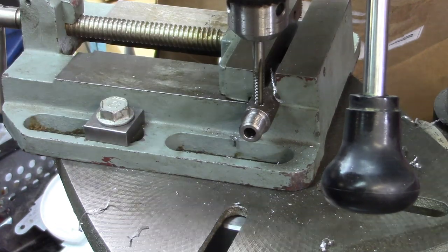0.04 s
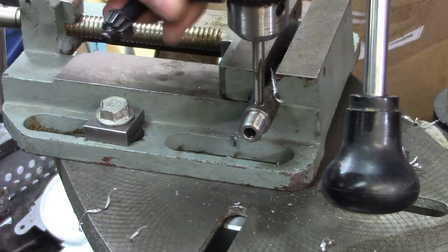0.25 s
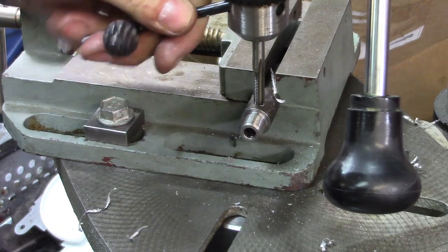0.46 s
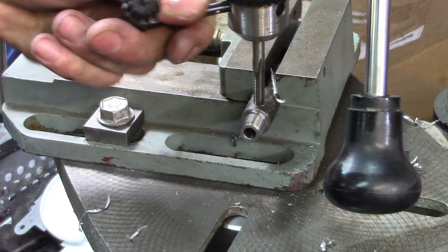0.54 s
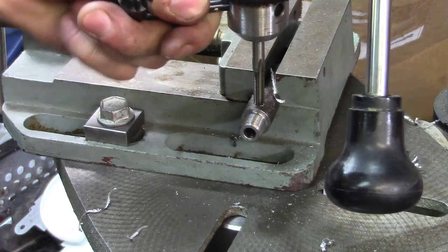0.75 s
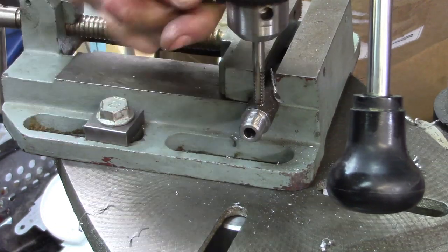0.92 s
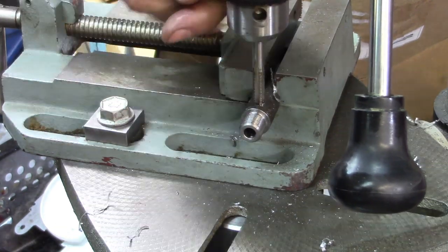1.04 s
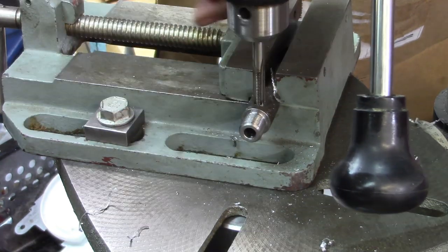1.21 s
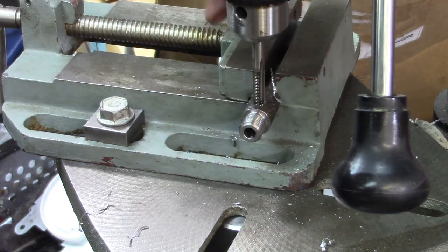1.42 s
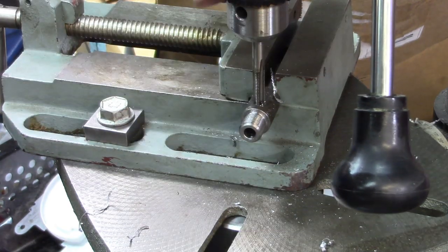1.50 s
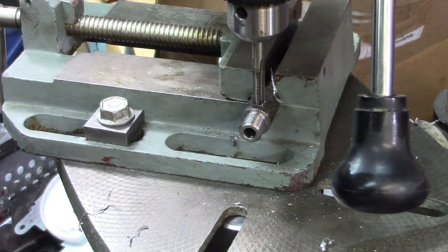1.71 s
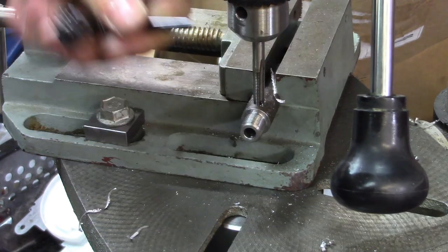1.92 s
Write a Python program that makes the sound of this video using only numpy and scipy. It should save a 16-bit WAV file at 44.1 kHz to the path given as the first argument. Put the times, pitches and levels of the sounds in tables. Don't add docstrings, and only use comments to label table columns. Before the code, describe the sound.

Close up in a quiet workshop, a hand seats a metal key with a bright clack, gives a cluster of dull hollow knocks, pauses, then pulls it free with lighter clicks and clinks.

```python
import sys
import numpy as np
from scipy import signal
from scipy.fft import rfft, irfft
from scipy.io import wavfile
from scipy.ndimage import uniform_filter1d

SR = 44100
rng = np.random.default_rng(int(sys.argv[2]) if len(sys.argv) > 2 else 0)


def linear_from_db(decibels):
    return 10 ** (np.asarray(decibels, float) / 20)


def waveform_to_disk(signal):
    frames = np.transpose(np.atleast_2d(signal))
    scaled = np.clip(frames, -1, 1) * 32767
    samples = np.round(scaled).astype(np.int16)
    wavfile.write(sys.argv[1], SR, samples)


N = 85995

# f/Hz, density/dB
SHOP_SPECTRUM = [(15, -40), (25, -3), (114, -2.5), (161, -6.5), (503, -7.5), (545, -6), (591, -9.5),
                 (2110, -21), (16000, -42)]
# t/s, level/dB
SHOP_ACTIVITY = [(0, 1.5), (.1, -4), (.22, 3.5), (.8, 1), (1.25, 3), (1.5, 1), (1.95, 2.5)]
# t/s, level/dB, push duration/ms, side panel level/dB
KNOCKS = [(.004, -50.5, 1, 3.5), (.2295, -25, 0.53, 9.5), (.2345, -14, 1, 4), (.256, -29.5, 0.49, -2),
          (.3345, -15.5, 1, -1), (.489, -26, 0.9, 0), (.507, -21.5, 0.35, -1.5), (.517, -46, 1, -7),
          (.527, -17, 0.97, 1), (.5365, -8.5, 0.52, -5), (.546, -18.5, 0.6, 0.5), (.557, -16, 0.48, -1.5),
          (.632, -47, 0.46, -2), (.663, -54, 0.77, 3), (.790, -64, 0.4, -11), (.955, -54.5, 0.4, 3),
          (1.045, -54, 0.14, -7), (1.485, -53, 0.71, -15), (1.594, -34, 0.93, 2.5), (1.609, -28.5, 1, 1),
          (1.640, -22.5, 0.16, -2.5), (1.694, -47, 0.18, 17.5), (1.722, -48.5, 0.99, 18),
          (1.729, -32, 0.082, 6.5), (1.745, -31, 0.43, 2.5), (1.8365, -45.5, 0.67, 3)]
# f/Hz, level/dB, T60/s
HEAD_MODES = [(513, -6, 0.22), (554.5, 3, 0.16), (582.7, -5, 0.2), (546, -27, 0.68)]
# f/Hz, level/dB, T60/s
PANEL_MODES = [(159, -26.5, 0.1), (278, -22, 0.15), (563, -8.5, 0.02), (366.2, -14.5, 0.22),
               (442, -8.5, 0.077), (464.5, -13.5, 0.17), (620.4, -12.5, 0.11), (689.5, -8.5, 0.11),
               (789.5, -4.5, 0.064), (868, -6.5, 0.048), (993, -24.5, 0.11), (1127, -25.5, 0.2),
               (1274, -21, 0.043), (1374, -32, 0.15)]
# t/s, level/dB
SCRAPE_LEVEL = [(.22, -103), (.235, -36.5), (.30, -50.5), (.39, -47.5), (.46, -72.5), (.50, -52),
                (.55, -42), (.62, -60), (.70, -69.5), (.78, -75.5), (1.56, -68), (1.60, -49.5),
                (1.70, -49.5), (1.76, -49.5), (1.81, -61.5), (1.89, -63), (1.95, -62)]
# f/Hz, density/dB
GRIT_SPECTRUM = [(300, -27.5), (900, 13.5), (1400, 6), (2500, -3), (4000, -8), (8000, -16), (15000, -25.5)]
# t/s, sleeve level/dB, sleeve contact f/Hz, jaws level/dB, key level/dB
CONTACTS = [(.2272, -28.5, 2570, -31.5, -38), (0.2294, -25.5, 3900, -28, -24.5),
            (0.2322, -25, 3020, -32, -44), (0.2331, -31, 3900, -26, -36), (.298, -43, 3200, -62, -70),
            (0.3301, -43, 2270, -36.5, -47), (0.3358, -36, 2840, -41.5, -50),
            (0.505, -43.5, 2800, -72, -77.5), (0.5359, -38, 2270, -68, -69.5),
            (.5495, -57.5, 4500, -64, -48), (0.6294, -53.5, 2700, -78, -76), (0.6655, -50, 4940, -66, -67),
            (0.779, -68, 3130, -58, -80), (0.862, -54.5, 2030, -80, -81), (1.374, -53, 2700, -75, -72),
            (1.594, -45, 3700, -74, -83), (1.636, -32, 2500, -38.5, -47), (1.6864, -21.5, 4200, -31.5, -59),
            (1.695, -36, 4500, -33, -42), (1.7305, -30.5, 2270, -38, -48), (1.7325, -36, 3700, -52, -46),
            (1.7444, -23.5, 3700, -29.5, -35.5), (1.88, -49.5, 2550, -62, -80)]
# f/Hz, level/dB, T60/s
SLEEVE_MODES = [(2030, -13, 0.05), (2270, 0.5, 0.028), (2510, -6, 0.067), (2800, -2, 0.012),
                (3047, -19, 0.029), (3700, -5.5, 0.017), (3900, -10.5, 0.036), (4130, -6.5, 0.026),
                (4500, -21, 0.031)]
# f/Hz, level/dB, T60/s
JAW_MODES = [(5210, -14, 0.045), (6110, -8, 0.0087), (6500, -11, 0.016), (7330, -12, 0.021),
             (8140, -9.5, 0.03)]
# f/Hz, level/dB, T60/s
KEY_MODES = [(9870, -13, 0.027), (10490, -5, 0.028), (10180, -28, .045), (11820, -7.5, 0.06),
             (12070, 0, 0.053), (12080, -15, .08), (13030, -26, .02)]
# t/s, f/Hz, level/dB, T60/s, free time/s
LINGERING = [(.232, 3970, -26.5, 0.014, 0.024), (.257, 3900, -53.5, .3, 0.039), (.240, 7420, -42, .05, .03),
             (.338, 7880, -55, 0.11, .02), (.775, 907, -54, 0.25, 0.04), (.862, 2030, -65, 0.91, 0.29),
             (1.285, 429, -52.5, 0.45, 0.15), (1.637, 2562, -47, 0.18, 0.059),
             (1.709, 8090, -60, .4, 0.022), (1.745, 3880, -53, 0.08, .045),
             (1.745, 8270, -41, 0.073, 0.013), (1.747, 5460, -43, 0.043, .03), (1.765, 985, -56, 0.72, .15)]
# t/s, level/dB
THUMPS = [
    (0.235, -28.5),
    (0.546, -42),
    (0.596, -41),
    (1.692, -55),
]
# t/s, main mode level/dB, low panel level/dB
NUDGES = [(0.2469, -20, -23), (.262, -33, -26.5), (.300, -41, -50), (.313, -32, -52), (.3665, -24.5, -33.5),
          (.3738, -25.5, -48), (.3811, -29, -42), (.405, -48, -39), (0.439, -44.5, -57.5),
          (.5440, -14, -40), (0.555, -21, -44.5), (.565, -14, -44), (.600, -34.5, -37), (.630, -51, -39),
          (.645, -37, -36.5), (.660, -34.5, -44.5), (0.672, -39.5, -44), (.680, -64, -36), (.712, -38, -60),
          (.745, -52, -62), (.800, -65, -69), (.845, -56, -62), (1.270, -65, -56), (1.465, -55, -67),
          (1.671, -31, -62), (1.726, -27, -57), (1.765, -34, -54), (1.778, -35.5, -66), (1.790, -49, -55),
          (1.805, -30.5, -56), (1.836, -35.5, -60)]
# f/Hz, T60/s
NUDGE_MODES = [(551, 0.073), (368, 0.1)]
# t/s, tick level/dB, f/Hz, rustle level/dB, rustle decay/s
TICKS = [
    (0.6649, -50.5, 4200, -56.5, 0.043),
    (0.26, -38, 3770, -40, 0.012),
    (.5495, -41, 3900, -58, 0.016),
    (.631, -52, 2200, -70, .01),
    (1, -63, 2600, -69, .01),
    (1.7, -56, 1000, -52, .03),
    (0.33, -50, 3000, -55, 0.0095),
    (0.779, -68, 3360, -60, 0.047),
    (1.400, -70, 4700, -65, 0.039),
    (1.886, -67, 3400, -53.5, 0.045),
]
# t/s, depth/dB, half width/s
GRIPS = [(0.26, 4, 0.0055), (.363, 12, 0.0059), (0.399, 14, 0.0051), (.432, 0, 0.0039), (.480, -8, .01),
         (.594, 11, 0.0039), (.624, 3, 0.0065), (.697, 14, 0.015), (1.606, 10, 0.0037), (1.669, 9, 0.0027),
         (1.713, 16, 0.0057), (1.766, 5, .004), (1.812, 8, .01), (1.870, 11, 0.013)]
# t/s, level/dB
COLLAR_TAPS = [
    (.555, -47),
    (.6365, -54),
    (1.596, -47),
    (1.613, -43),
    (1.693, -35.5),
    (1.702, -40),
    (1.738, -40.5),
    (1.752, -46),
]
# f/Hz, level/dB, T60/s
COLLAR_MODES = [(1240, 2.5, 0.044), (1406, 6, 0.055), (1450, -16, 0.032)]


def unit(x):
    return x / np.sqrt(np.mean(x ** 2))


def ring(x, hz, t60):
    pole = np.exp(2j * np.pi * hz / SR - np.log(1000) / (t60 * SR))
    return signal.lfilter([1], [1, -pole], x).imag


def impulses(times, db):
    drive = np.zeros(N)
    drive[(np.asarray(times) * SR).astype(int)] = linear_from_db(db)
    return drive


def colour(x, table):
    f = np.arange(len(x) // 2 + 1) * SR / len(x) + 1
    points = np.array(table)
    gain_db = np.interp(np.log(f), np.log(points[:, 0]), points[:, 1])
    return irfft(rfft(x) * linear_from_db(gain_db), len(x))


def walk(rate_hz):
    k = int(SR / rate_hz)
    steps = np.repeat(rng.standard_normal(N // k + 1), k)
    return unit(uniform_filter1d(uniform_filter1d(steps, k), k)[:N])


def curve(table):
    points = np.array(table)
    return linear_from_db(np.interp(np.arange(N) / SR, points[:, 0], points[:, 1]))


def shop():
    hum_noise, air = rng.standard_normal((2, N))
    air = unit(colour(air, SHOP_SPECTRUM)) * linear_from_db(-56.5 + 0.8 * walk(6.9)) * curve(SHOP_ACTIVITY)
    hum_hz, hum_width_hz = 540.4, 16
    hum = unit(ring(hum_noise, hum_hz, np.log(1000) / np.pi / hum_width_hz))
    return air + hum * linear_from_db(-67.5 + 2 * walk(9.4))


def push(offset_db):
    drive = np.zeros(N)
    for (s, level_db, ms, _), db in zip(KNOCKS, offset_db):
        pulse = np.hanning(max(int(ms * SR / 1000), 2) + 2)
        start = int(s * SR)
        drive[start:start + len(pulse)] += pulse / pulse.sum() * linear_from_db(level_db + db)
    return drive


def head(grit):
    out = np.zeros(N)
    panel_db = np.array(KNOCKS)[:, 3]
    grit_drive = grit * linear_from_db(-10) / 10
    for modes, knock_db, spread_db in ((HEAD_MODES, 0 * panel_db, 0.4), (PANEL_MODES, panel_db, 2)):
        chance = rng.standard_normal((len(KNOCKS), len(modes)))
        for m, (hz, db, t60) in enumerate(modes):
            drive = push(knock_db + spread_db * chance[:, m]) + grit_drive
            out += (-1) ** m * linear_from_db(db) * ring(drive, hz, t60)
    return signal.lfilter(*signal.butter(2, 140, "high", fs=SR), out)


def scrape():
    impacts_per_s = 1500
    hit = rng.random(N) < impacts_per_s / SR
    size_db = np.minimum(1.8 * rng.exponential(size=N), 14)
    size = linear_from_db(size_db) * rng.standard_normal(N)
    grit = unit(colour(hit * size + 0.29 * rng.standard_normal(N), GRIT_SPECTRUM))
    return grit * curve(SCRAPE_LEVEL) * linear_from_db(2.5 * walk(60.13))


def clinks():
    rows = np.array(CONTACTS)
    times, out = rows[:, 0], np.zeros(N)
    seated = np.arange(N) > 0.3 * SR
    crack_decay_s, crack_t60_s = 0.0047, 0.00027
    for col, modes, crack_hz in ((1, SLEEVE_MODES, 1100), (3, JAW_MODES, 5470), (4, KEY_MODES, 12900)):
        is_key = modes is KEY_MODES
        wobble_db = 5 if is_key else 1.8
        chance = rng.standard_normal((len(rows), len(modes)))
        for m, (hz, db, t60) in enumerate(modes):
            level_db = rows[:, col] + 1.5 * chance[:, m]
            if modes is SLEEVE_MODES:
                level_db = level_db - 18.5 * np.abs(np.log2(hz / rows[:, 2]))
            drive = impulses(times, level_db) * (-1) ** m
            if is_key:
                dulling = linear_from_db(-55 * np.log2(hz / KEY_MODES[1][0]))
                tone = ring(drive * ~seated, hz, t60) + dulling * ring(drive * seated, hz, t60 * 0.45)
            else:
                tone = ring(drive, hz, t60)
            out += linear_from_db(db + wobble_db * walk(150)) * tone
        crack = ring(ring(rng.standard_normal(N), crack_hz, crack_t60_s), crack_hz, crack_t60_s)
        decay = [1, -np.exp(-1 / (crack_decay_s * SR))]
        out += signal.lfilter([1], decay, impulses(times, rows[:, col] - 9)) * unit(crack)
    return signal.sosfilt(signal.butter(3, (700, 13000), "band", fs=SR, output="sos"), out)


def linger():
    t, out = np.arange(N) / SR, np.zeros(N)
    for s, hz, db, t60, free_s in LINGERING:
        touched = np.exp(-np.maximum(t - s - free_s, 0) / 0.004)
        out += linear_from_db(db + 4 * walk(120)) * touched * ring(impulses(s, 0), hz, t60)
    return out


def thumps():
    times, db = np.transpose(THUMPS)
    drive = uniform_filter1d(uniform_filter1d(impulses(times, db), 150), 150)
    return ring(drive, 62, 0.11)


def nudges():
    rows, out = np.array(NUDGES), np.zeros(N)
    swell_t60_s = 0.012
    for m, (hz, t60) in enumerate(NUDGE_MODES):
        swell = ring(impulses(rows[:, 0], rows[:, 1 + m]), hz, swell_t60_s)
        out += ring(swell, hz, t60) * 2 * np.log(1000) / (swell_t60_s * SR)
    return out


def ticks():
    t, out = np.arange(N) / SR, np.zeros(N)
    for s, tick_db, hz, rustle_db, rustle_s in TICKS:
        after = np.maximum(t - s, 0)
        tick = linear_from_db(tick_db) * np.exp(-after / 0.0012)
        rustle = linear_from_db(rustle_db) * np.exp(-after / rustle_s)
        noise = ring(ring(rng.standard_normal(N), hz, 0.00055), hz, 0.00055)
        out += (t >= s) * (tick + rustle) * unit(noise)
    return out


def grip():
    t = np.arange(N) / SR
    return linear_from_db(-sum(db * np.exp(-((t - s) / half_s) ** 2) for s, db, half_s in GRIPS))


def collar():
    times, db = np.transpose(COLLAR_TAPS)
    drive = uniform_filter1d(impulses(times, db), 12)
    return sum((-1) ** m * linear_from_db(db) * ring(drive, hz, t60) for m, (hz, db, t60) in enumerate(COLLAR_MODES))


def room(x):
    t = np.arange(SR // 2) / SR
    noise = rng.standard_normal(len(t))
    low = signal.lfilter(*signal.butter(2, 2500, fs=SR), noise)
    low_t60_s, high_t60_s, onset_s = 0.25, 0.21, 0.0015
    tail = low * linear_from_db(-60 * t / low_t60_s) + (noise - low) * linear_from_db(-60 * t / high_t60_s)
    tail = tail * (1 - np.exp(-t / onset_s))
    return signal.fftconvolve(x, tail / np.sqrt(np.sum(tail ** 2)))[:N] * linear_from_db(-12.5)


def scene():
    grit = scrape()
    press_head = (head(grit) + nudges()) * grip()
    near = press_head + clinks() + collar() + grit + linger() + ticks()
    return (near + room(near) + thumps() + shop())[None]


def low_pass(x):
    return signal.sosfilt(signal.butter(12, 15830, fs=SR, output="sos"), x)


def record(dry):
    dry = signal.sosfilt(signal.butter(4, 14300, fs=SR, output="sos"), dry)
    mix = dry + linear_from_db(-77) * rng.standard_normal(dry.shape)
    return low_pass(mix)


dry = scene()
out = record(dry)
waveform_to_disk(out)
```